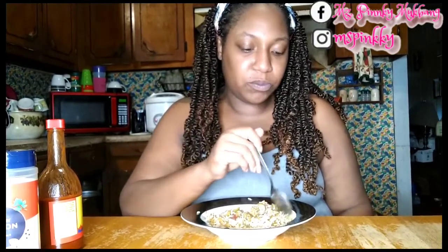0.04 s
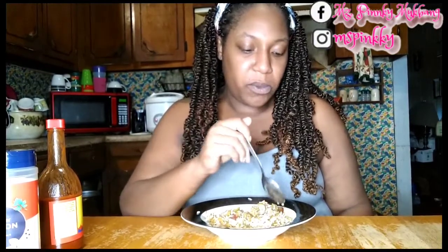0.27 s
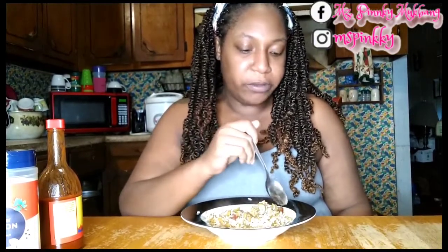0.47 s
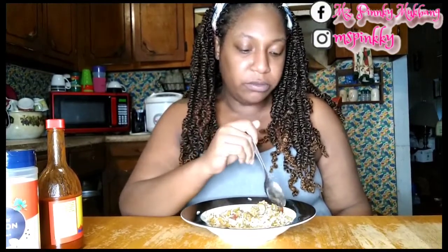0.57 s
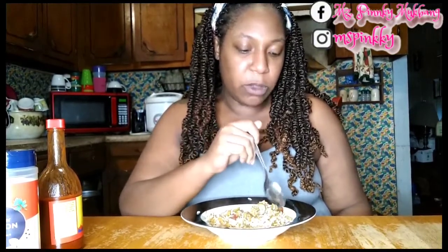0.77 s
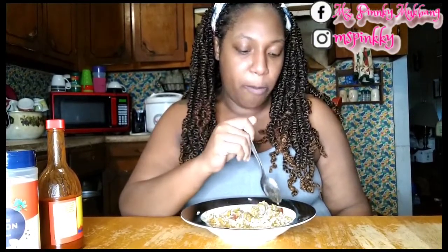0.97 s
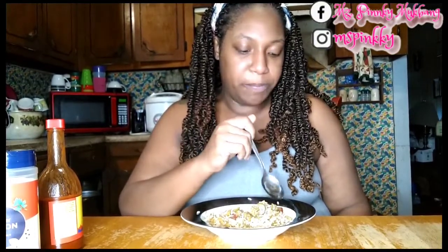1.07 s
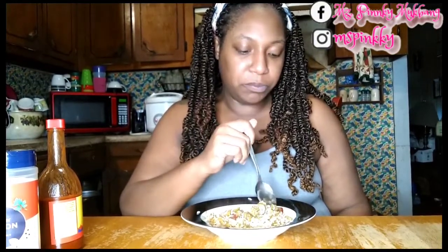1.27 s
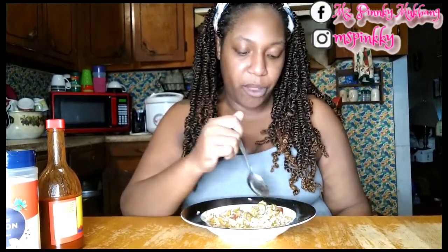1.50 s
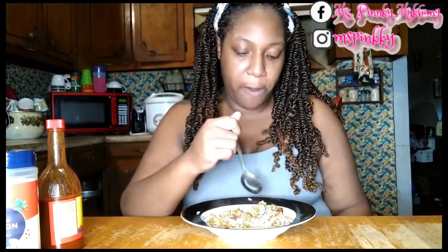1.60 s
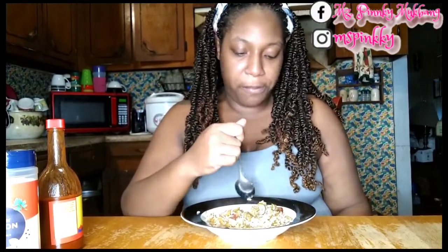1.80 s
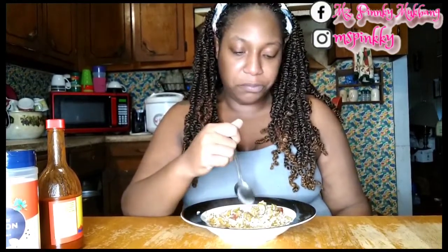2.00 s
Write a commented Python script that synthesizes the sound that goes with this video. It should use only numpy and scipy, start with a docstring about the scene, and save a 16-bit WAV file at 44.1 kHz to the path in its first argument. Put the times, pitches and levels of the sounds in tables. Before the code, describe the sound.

A metal spoon clinks on a china bowl, first hard and bright, then three softer taps, with faint wet eating clicks between, in a small kitchen with a low hum, through a close, slightly dull microphone.

```python
"""A low hum and dull room noise open the scene as an earlier spoon clink dies away.
Faint wet clicks of eating, short bands of noise, fall around four clinks of a metal spoon on a china bowl.
Each clink, the first one hard, is a noise crack, decaying sine modes of bowl and spoon, and a
low noise knock of the bowl on the kitchen table. The small room carries each one on.
A narrow-band microphone hears it all."""
import sys
import numpy as np
from scipy import signal
from scipy.fft import rfft, irfft
from scipy.io import wavfile
from scipy.ndimage import uniform_filter1d

SR = 44100
rng = np.random.default_rng(int(sys.argv[2]) if len(sys.argv) > 2 else 0)


def wrap_up_sound(samples):
    """Save the sound to the file named by the first command line argument, as 16-bit audio."""
    columns = np.atleast_2d(samples).T
    # keep every value between -1 and 1, then stretch to whole-number steps
    tamed = np.clip(columns, -1, 1)
    steps = np.round(tamed * 32767).astype(np.int16)
    wavfile.write(sys.argv[1], SR, steps)


N = 90404
t = np.arange(N) / SR


def undb(db):
    """Decibels to gain."""
    return 10 ** (np.asarray(db) / 20)


def unit(x):
    """Scale a short sound to the energy of 0.1 s at rms 1."""
    return x / np.sqrt(np.sum(x ** 2) * 10 / SR + 1e-18)


def fade(t60, rise):
    """A quick rise (time constant in s) and an exponential decay (60 dB in t60 s)."""
    return (1 - np.exp(-t / rise)) * np.exp(-np.log(1000) * t / t60)


def noise(points):
    """Noise of rms 1, shaped by a spectrum of (frequency [Hz], density [dB per Hz]) points."""
    hz, db = np.array(points, float).T
    f = np.maximum(np.fft.rfftfreq(N, 1 / SR), 1)
    gain = undb(np.interp(np.log(f), np.log(hz), db))
    x = irfft(rfft(rng.standard_normal(N)) * gain, N)
    return x / x.std()


def walk(rate):
    """Slow random wander with a spread near 1, redrawn rate times a second and smoothed."""
    hold = int(SR / rate)
    steps = np.repeat(rng.standard_normal(N // hold + 1), hold)
    return uniform_filter1d(steps, hold)[:N]


def add(out, x, start):
    """Mix x in from a start time in seconds, which may be negative."""
    i = int(round(start * SR))
    x = x[max(-i, 0):N - max(i, 0)]
    out[max(i, 0):max(i, 0) + len(x)] += x


HUM_HZ, HUM_DB = 149.4, -52
HUM_WAVER_HZ, HUM_WAVER_DB = 0.21, 0.8
AIR_DB = -49.5
# faint steady whines over the hum: (frequency [Hz], level [dB])
WHINES = [(694, -68), (1050, -72), (2934, -73)]
# dull room noise with a low rumble: (frequency [Hz], relative density [dB per Hz])
AIR = [(25, -7.5), (60, -13.5), (100, -26.5), (130, -14), (230, -11), (300, -14), (450, -18.5), (600, -24),
       (900, -23), (1400, -27), (2100, -32), (3500, -31.5), (5500, -39), (7400, -35.5), (8000, -56)]


def background():
    """A slightly wavering appliance hum and its faint whines over dull room noise."""
    phase = 2 * np.pi * np.cumsum(HUM_HZ + HUM_WAVER_HZ * walk(7)) / SR
    hum_level = undb(HUM_DB + HUM_WAVER_DB * walk(11))
    hum = np.sqrt(2) * np.sin(phase) * hum_level
    whines = sum(np.sqrt(2) * undb(db) * np.sin(2 * np.pi * hz * t) for hz, db in WHINES)
    return hum + whines + noise(AIR) * undb(AIR_DB)


ROOM_GAP_S = 0.0054  # wait before the first reflection
EARLY_S, EARLY_T60_S, LATE_T60_S = 0.097, 0.32, 0.2
TREBLE_HZ, TREBLE_DAMPING = 4500, 1.56  # above this the room dies faster by this factor


def kitchen():
    """Room response: strong early reflections, then a faster dying tail; the treble goes first."""
    early = np.minimum(t, EARLY_S) / EARLY_T60_S
    late = np.maximum(t - EARLY_S, 0) / LATE_T60_S
    decay = np.log(1000) * (early + late)
    echoes = rng.standard_normal(N)
    low = signal.sosfiltfilt(signal.butter(2, TREBLE_HZ, fs=SR, output="sos"), echoes)
    response = low * np.exp(-decay) + (echoes - low) * np.exp(-decay * TREBLE_DAMPING)
    return (response * (t > ROOM_GAP_S))[:SR // 2]


def heard(x, room, wet):
    """Direct sound plus reflections, which take the share wet of the energy."""
    echoed = signal.fftconvolve(x[:len(room)], room)
    echoed = np.pad(echoed, (0, N))[:N]
    return unit(np.sqrt(1 - wet) * unit(x) + np.sqrt(wet) * unit(echoed))


RING_RISE_S = 0.0023
# kinds of touch, in the order of the level columns of the modes
TOUCHES = ("hard", "poke", "nudge", "glance")
# china bowl modes: (frequency [Hz], base t60 [s], then relative level [dB] for
# a hard blow, a soft poke, a light nudge, a glancing tap)
BOWL = [(469, .08, -50.5, -51, -48.5, -43.5), (596.3, .067, -38, -49, -54, -79),
        (857, 0.045, -47.5, -41.5, -45.5, -60), (950, 0.044, -28, -52, -52.5, -47.5),
        (1027, .06, -42.5, -53, -52, -45), (1767, .071, -47, -55, -57.5, -41),
        (2170.7, .1, -27, -45.5, -43.5, -40), (2295, 0.024, -35.5, -63, -75, -48),
        (2687, .03, -52, -55, -51, -46), (3308, .06, -34, -35, -37.5, -53),
        (3406, .1, -20, -36.5, -37, -38), (3541, .035, -35, -40, -37, -39),
        (3810, .03, -52.5, -64, -49, -37), (4184, .04, -34.5, -60, -55, -42),
        (4566, 0.027, -30.5, -50.5, -56, -40.5), (5250, .045, -20.5, -45, -50, -42),
        (5803, 0.036, -19, -66, -63, -62), (6040, .04, -47, -50.5, -54, -64),
        (6394, 0.035, -52, -58, -62, -33), (6453, .051, -31, -38.5, -36.5, -40),
        (7151, .04, -22.5, -40.5, -48.5, -52)]
# metal spoon modes: same columns, (base frequency [Hz], base t60 [s], four relative levels [dB])
SPOON = [(4400, 0.24, -34, -35.5, -34, -47), (5400, 0.34, -38.5, -32, -33.5, -48),
         (6660, .04, -45.5, -57, -33, -39.5), (7623, .06, -50, -41.5, -41, -44.5),
         (8440, .075, -60.5, -53.5, -51, -51)]


def ring(modes, touch, tilt_db, length, room, wet, pitch=1):
    """Decaying sine modes; the kind of touch sets how strongly each one sounds."""
    out = np.zeros(N)
    for hz, t60, *levels in modes:
        mode = np.sin(2 * np.pi * (hz * pitch * t + rng.random()))
        mode *= fade(t60 * length, RING_RISE_S)
        tilt = tilt_db * np.log2(hz / 3400)  # dB per octave around 3400 Hz
        level = levels[TOUCHES.index(touch)] + tilt
        out += undb(level) * heard(mode, room, wet)
    return out


# a clink still dying away at the start: (time before the start [s], bowl gain [dB], spoon gain [dB])
EARLIER = (0.11, -6.5, 3)


def earlier_clink():
    """The late ring of bowl and spoon from a hard blow, mostly carried by the room."""
    out, room = np.zeros(N), kitchen()
    ago, bowl_db, spoon_db = EARLIER
    for modes, db in ((BOWL, bowl_db), (SPOON, spoon_db)):
        tail = ring(modes, "hard", tilt_db=0, length=0.93, room=room, wet=0.8)
        add(out, undb(db) * tail, -ago)
    return out


CLICK_RISE_S, CLICK_T60_S = 0.001, 0.014
CLICK_OCTAVES = 0.13  # distance from the centre to the -5 dB points
CLICK_WET = 0.31
# wet clicks of eating: (time [s], centre frequency [Hz], level [dB])
CLICKS = [(.098, 2630, -60.5), (0.469, 6940, -64.5), (.482, 4380, -61), (0.4919, 2600, -53),
          (.493, 5000, -67), (0.512, 3770, -60.5), (0.607, 7200, -71), (.909, 7290, -58),
          (0.912, 3300, -51.5), (1.676, 2500, -57), (1.678, 5200, -64.5), (1.711, 5800, -64.5),
          (1.726, 7100, -66)]


def wet_clicks():
    """Tiny smacks, each a few milliseconds of noise around one pitch."""
    out, room = np.zeros(N), kitchen()
    for start, hz, db in CLICKS:
        side = 2 ** CLICK_OCTAVES
        band = [(hz / 4, -35), (hz / side, -5), (hz, 0), (hz * side, -5), (hz * 4, -45)]
        smack = noise(band) * fade(CLICK_T60_S, CLICK_RISE_S)
        add(out, undb(db) * heard(smack, room, CLICK_WET), start)
    return out


KNOCK_T60_S, KNOCK_WET = 0.05, 0.57
# knock of bowl on table: (base frequency [Hz], relative density [dB per Hz])
KNOCK = [(60, -46.5), (110, -5.5), (170, 6.5), (260, 12), (520, 4), (720, -6), (1050, -16), (1400, -9),
         (2500, -29)]


def table_knock(pitch, room):
    """A short low thud of noise, its spectrum shifted by a pitch factor."""
    spectrum = [(hz * pitch, db) for hz, db in KNOCK]
    return heard(noise(spectrum) * fade(KNOCK_T60_S, RING_RISE_S), room, KNOCK_WET)


CRACK_RISE_S, CRACK_T60_S, CRACK_WET = 0.0004, 0.0051, 0.87
# crack of the contact: (frequency [Hz], relative density [dB per Hz])
CRACK = [(800, -16.5), (1600, -7.5), (3000, 3.5), (4500, -7), (6500, -7), (7600, -9), (8300, -31)]


def contact_crack(room):
    """A very short bright burst of noise, heard mostly by way of the room."""
    return heard(noise(CRACK) * fade(CRACK_T60_S, CRACK_RISE_S), room, CRACK_WET)


# clinks: (time [s], touch, bowl gain [dB], spoon gain [dB], spoon pitch [factor],
# treble tilt [dB per octave], ring length [factor], share of the ring's energy that comes by the room,
# knock level [dB], knock pitch [factor], crack level [dB])
CLINKS = [(0.2123, "hard", -2.5, 0, 1, 1, 1.03, .56, -38, 1.08, -30.5),
          (0.9215, "poke", 2, -6, 1, -0.5, 0.86, 0.42, -39, 1.04, -40),
          (1.332, "nudge", -0.3, -10, 1, 0, 0.94, 0.53, -42, 0.77, -50),
          (1.9904, "glance", -5, 1.2, 1.008, 0, 0.53, .28, -40, 0.87, -45.5)]


def clinks():
    """Each contact cracks, rings bowl and spoon, and knocks the bowl on the table."""
    out = np.zeros(N)
    for (start, touch, bowl_db, spoon_db, spoon_pitch, tilt_db, length, wet,
         knock_db, knock_pitch, crack_db) in CLINKS:
        room = kitchen()
        clink = undb(bowl_db) * ring(BOWL, touch, tilt_db, length, room, wet)
        clink += undb(spoon_db) * ring(SPOON, touch, tilt_db, length, room, wet, spoon_pitch)
        clink += undb(knock_db) * table_knock(knock_pitch, room)
        clink += undb(crack_db) * contact_crack(room)
        add(out, clink, start)
    return out


def scene():
    """The table and the room, in mono."""
    return (background() + earlier_clink() + wet_clicks() + clinks())[None]


DRIVE_DB, CLIP_LEVEL = 0.5, 0.92
LOW_CUT_HZ, TOP_HZ = 90, 8100


def record(dry):
    """The microphone clips hard peaks, thins the bass and cuts the treble steeply."""
    clipped = np.clip(dry * undb(DRIVE_DB), -CLIP_LEVEL, CLIP_LEVEL)
    thin = signal.sosfilt(signal.butter(4, LOW_CUT_HZ, "highpass", fs=SR, output="sos"), clipped)
    # 0.3 dB passband ripple, 70 dB down beyond the top
    return signal.sosfilt(signal.ellip(8, 0.3, 70, TOP_HZ, fs=SR, output="sos"), thin)


dry = scene()
out = record(dry)
wrap_up_sound(out)
```